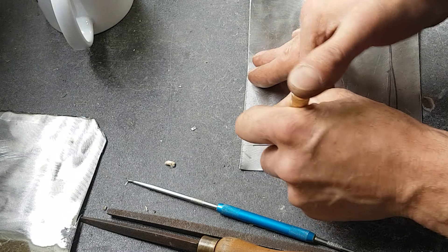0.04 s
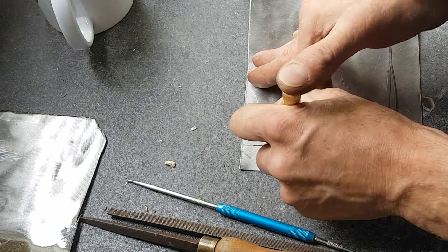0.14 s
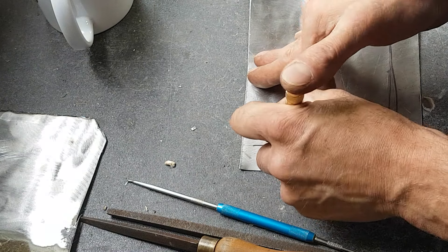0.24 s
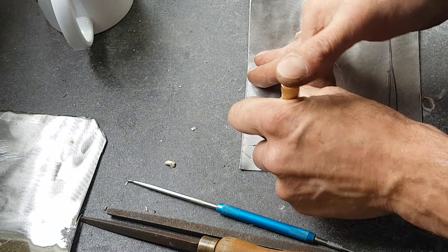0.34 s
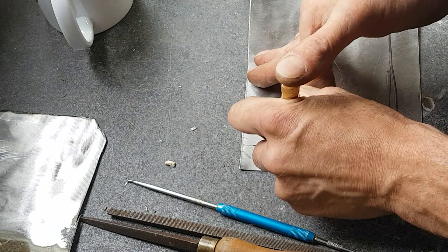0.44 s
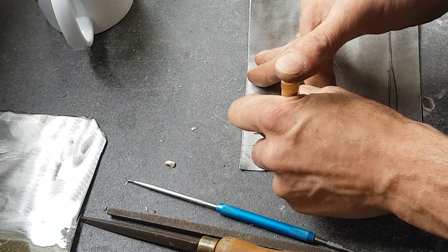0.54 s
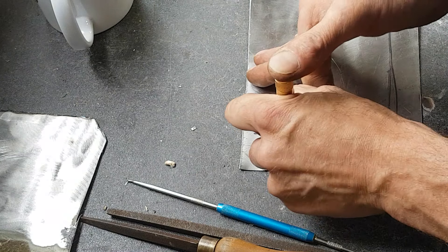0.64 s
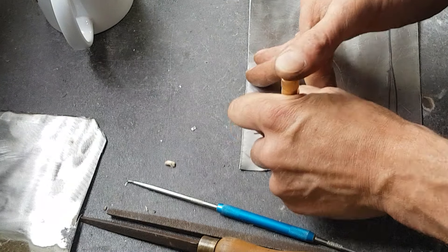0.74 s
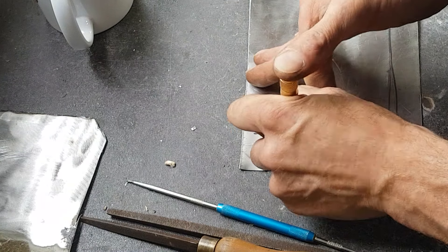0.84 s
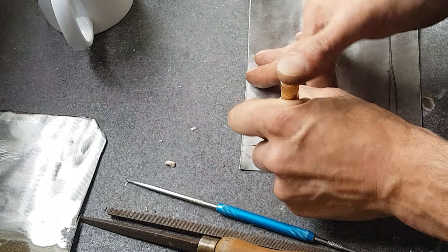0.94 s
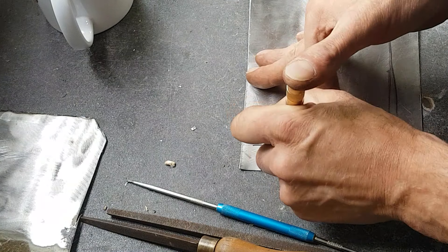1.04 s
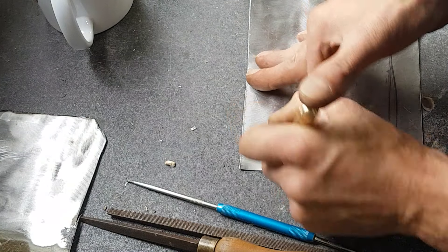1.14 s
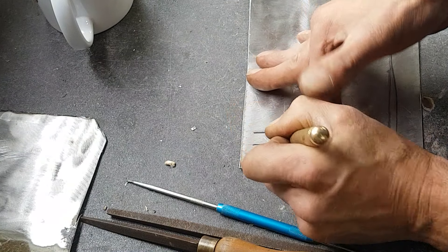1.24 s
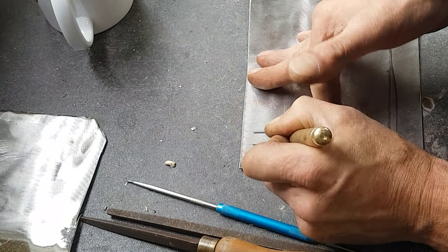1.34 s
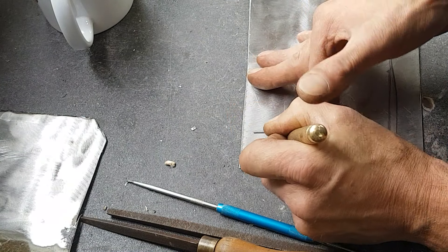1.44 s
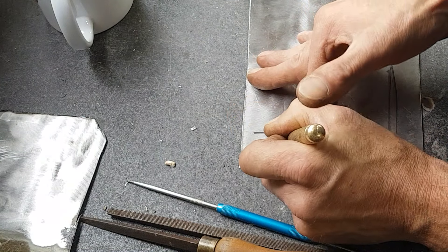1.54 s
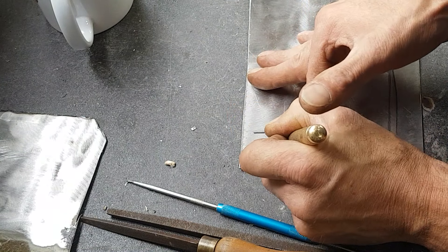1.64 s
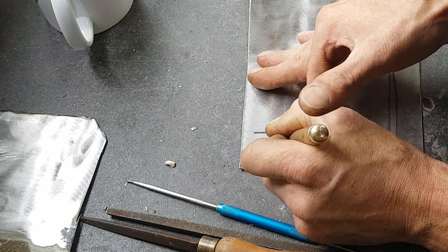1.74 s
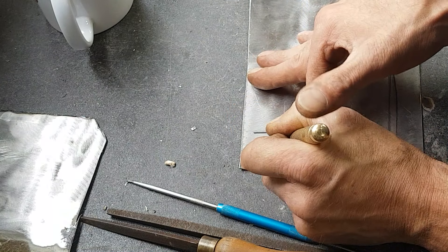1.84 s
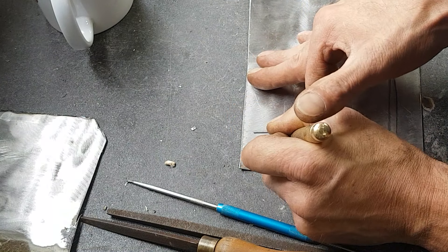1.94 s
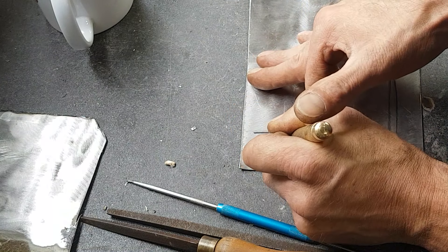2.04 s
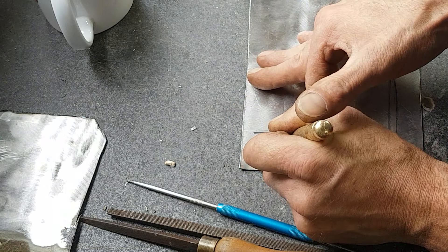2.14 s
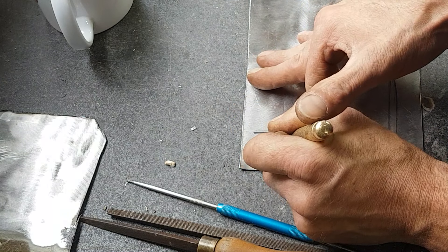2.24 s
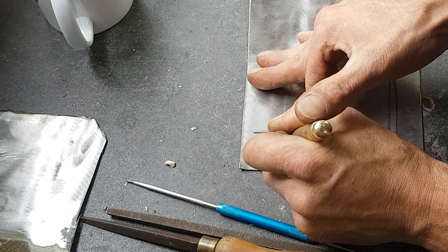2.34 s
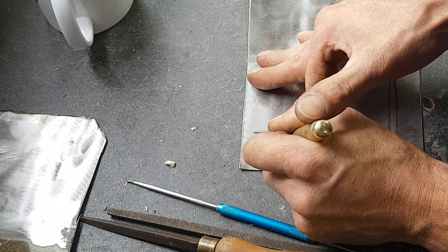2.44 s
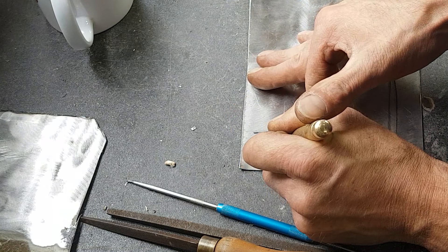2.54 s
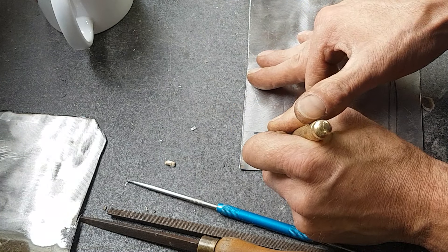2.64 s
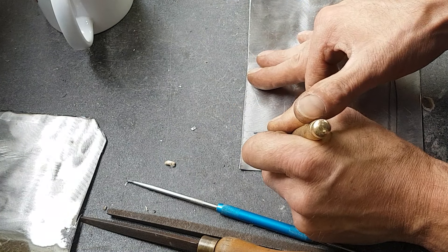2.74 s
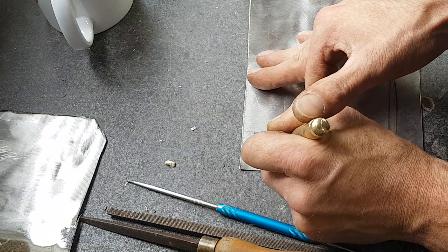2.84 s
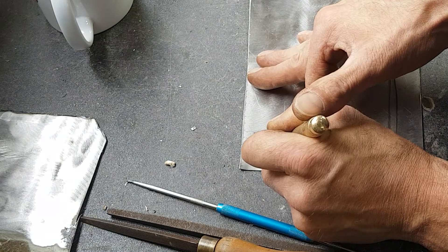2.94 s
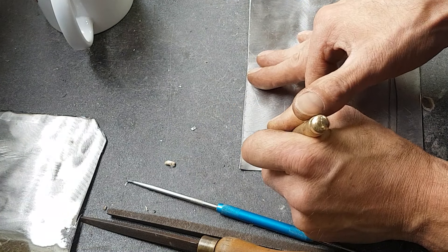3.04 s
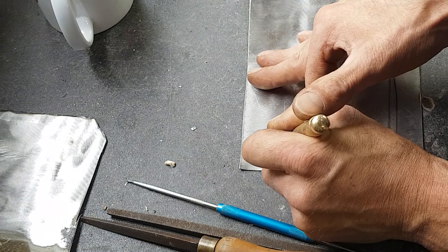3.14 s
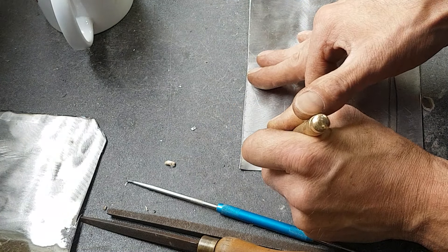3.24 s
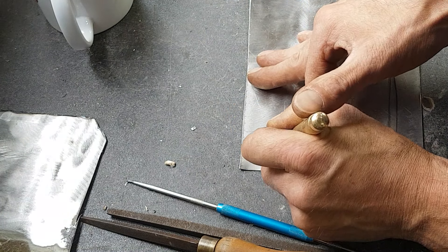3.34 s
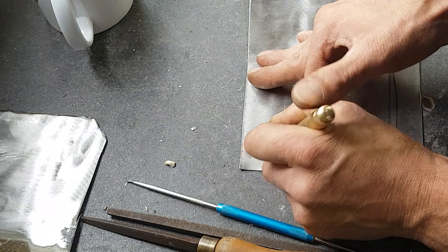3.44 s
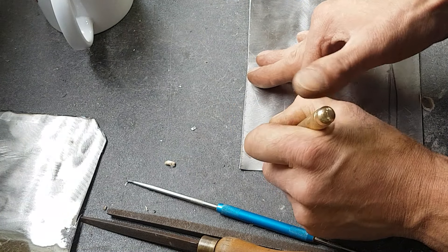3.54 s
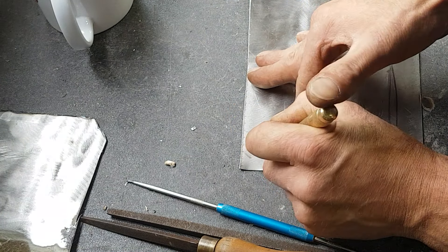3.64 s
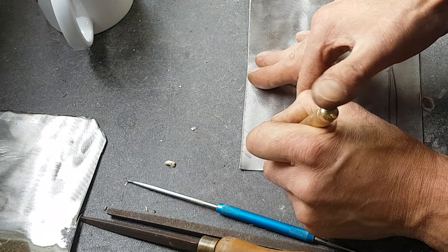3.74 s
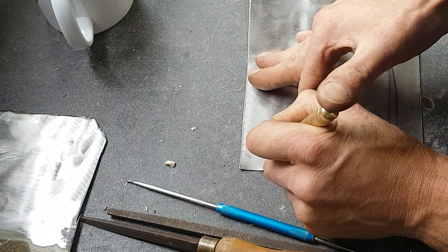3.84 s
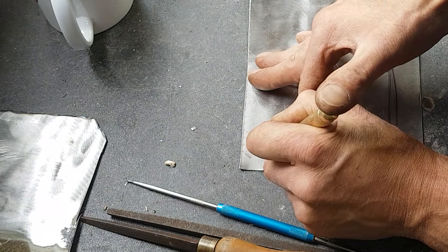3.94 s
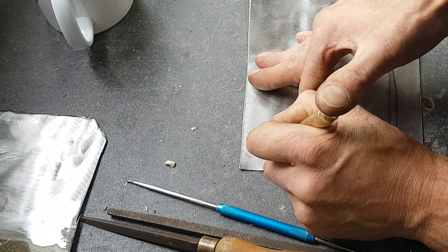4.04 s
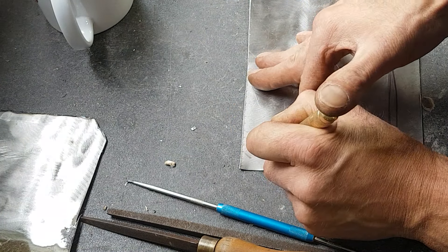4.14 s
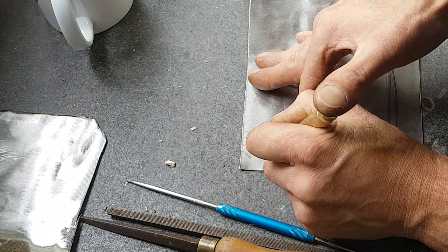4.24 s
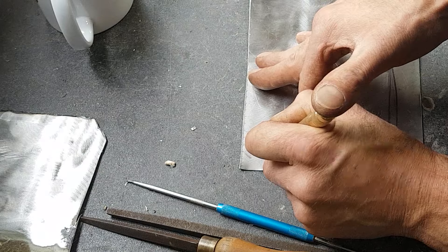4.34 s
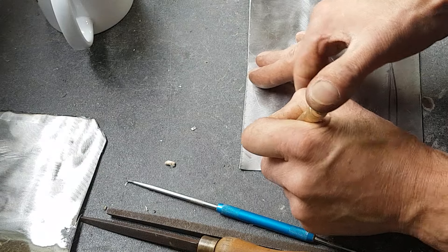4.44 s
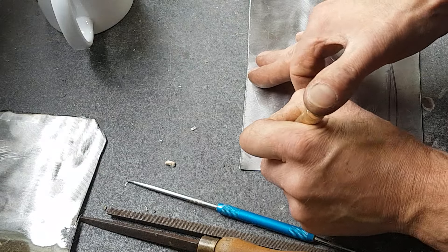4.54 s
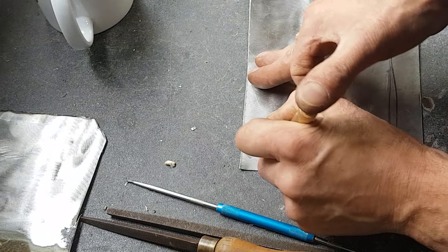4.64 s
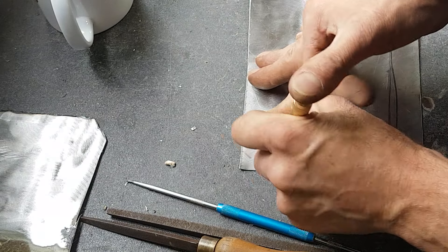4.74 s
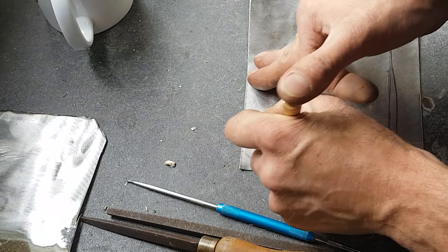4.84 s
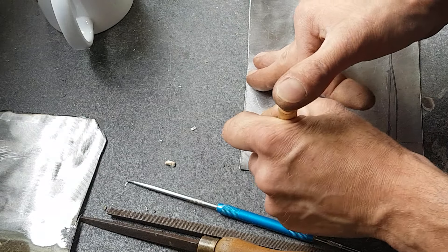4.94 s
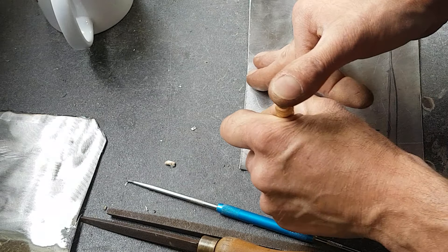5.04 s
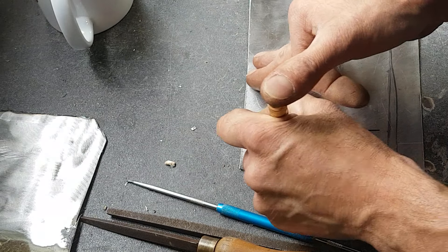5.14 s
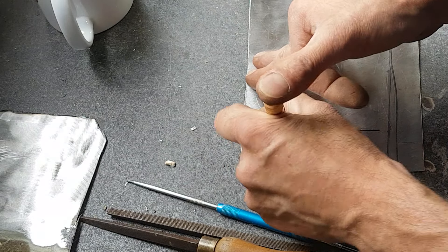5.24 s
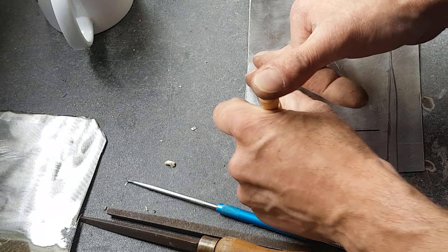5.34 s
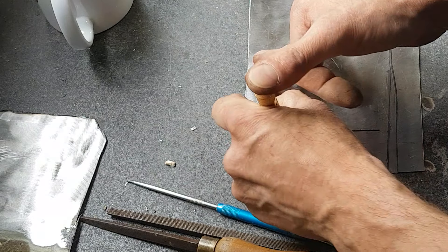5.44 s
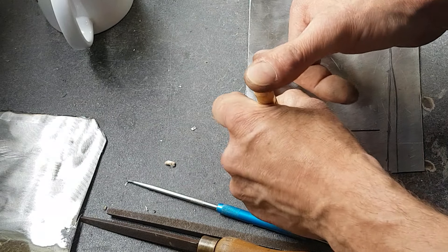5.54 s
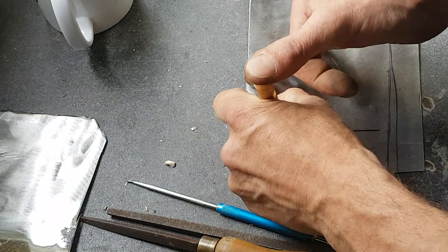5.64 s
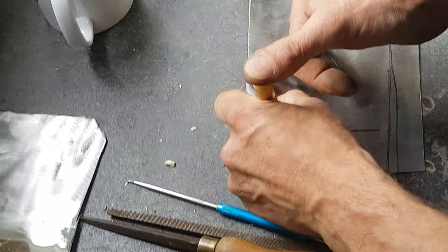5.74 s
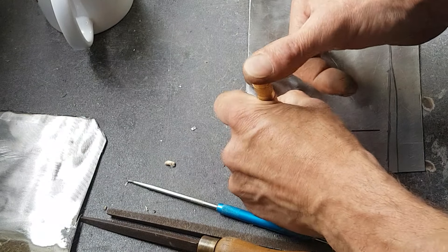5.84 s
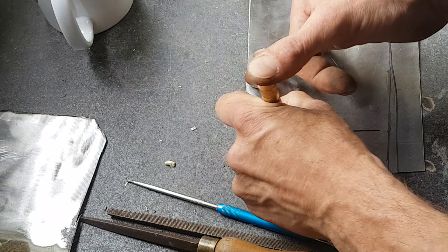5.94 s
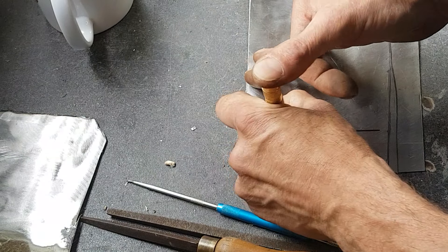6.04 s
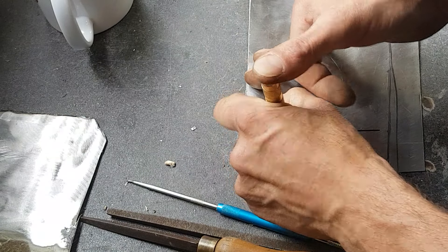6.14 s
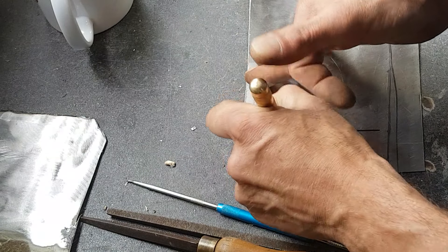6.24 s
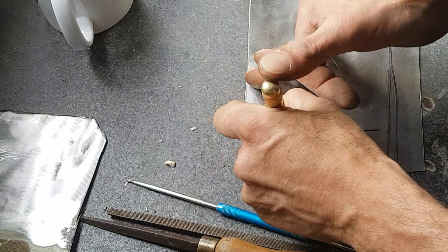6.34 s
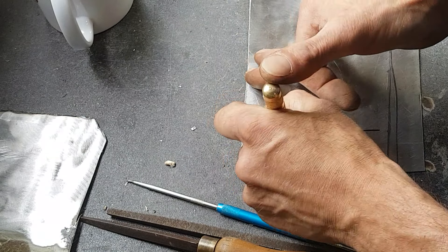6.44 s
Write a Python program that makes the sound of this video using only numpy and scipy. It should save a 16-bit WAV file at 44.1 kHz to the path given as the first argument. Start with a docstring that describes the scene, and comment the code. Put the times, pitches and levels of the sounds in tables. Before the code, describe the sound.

A spring punch fires twice on thin sheet steel, loud metallic cracks with short clatter, between small tip ticks, scrapes and bench thuds.

```python
"""A spring punch is pressed on thin sheet steel on a bench until it fires, twice: cracks, struck modes, clatter.
Its tip ticks and drags, as smaller strikes and as slips driving the sheet; shoves rock the sheet on the bench.
Fingers rub the steel as soft friction noise; a workshop hums softly as shaped noise.
The left microphone port faces the work; the recorder limits the blows and is slow to open up again."""
import sys
import numpy as np
from scipy import signal
from scipy.fft import rfft, irfft, next_fast_len
from scipy.io import wavfile
from scipy.ndimage import uniform_filter1d, minimum_filter1d, map_coordinates

SR = 44100
rng = np.random.default_rng(int(sys.argv[2]) if len(sys.argv) > 2 else 0)


def output_pcm(signal):
    """Save a mono or channel-first signal as 16-bit PCM at the path in sys.argv[1].

    Samples are clipped to [-1, 1] before scaling.
    """
    pcm = np.clip(np.atleast_2d(signal).T, -1, 1) * 32767
    wavfile.write(sys.argv[1], SR, np.round(pcm).astype(np.int16))


N = 287091

# workshop murmur spectrum: (frequency [Hz], relative level [dB])
MURMUR_SPECTRUM = [(55, -6.5), (90, -2), (130, -8), (196, -3), (265, -11), (765, -15), (1940, -21.5),
                   (3790, -27), (6100, -33.5), (9000, -38.5), (13000, -31.5), (15600, -28), (15900, -74.5)]
# workshop rumble spectrum: (frequency [Hz], relative level [dB])
RUMBLE_SPECTRUM = [(12, -41.5), (20, -2.5), (22, -10), (48, 7.5), (91, -7.5), (130, 0), (170, -36.5),
                   (290, -120)]
# murmur likeness of left and right: (frequency [Hz], likeness [-1 to 1])
MURMUR_LIKENESS = [(60, 1), (130, 1), (290, 0.27), (640, .12), (1500, .03)]
# finger friction spectrum: (frequency [Hz], relative level [dB])
SKIN_SPECTRUM = [(300, -12.5), (900, 3), (2200, 0.5), (4000, -4.5), (6000, -8.5), (9000, -27),
                 (14000, -17.5), (16000, -47.5)]
# finger strokes over the steel: (middle [s], length [s], level [dB])
STROKES = [(1.411, 0.78, -55.5), (3.639, 0.28, -56.5), (4.425, 0.29, -58.5), (4.673, 0.49, -58),
           (6.44, 0.65, -62)]
# hand shoves: (slip time [s], build-up [s], thud level [dB], rocking level [dB], dragging level [dB])
SHOVES = [(0.061, 0.017, -40, -36, -43.5), (.09, 0.018, -48, -49, -50), (.17, 0.043, -41, -36.5, -56),
          (0.193, 0.033, -39, -36, -39), (0.224, 0.043, -35.5, -37.5, -48), (.29, 0.024, -39.5, -43, -37),
          (0.362, 0.044, -32.5, -33, -32.5), (0.403, 0.047, -33, -32, -25), (0.477, 0.011, -35, -34, -38),
          (.53, 0.024, -37.5, -39, -39), (.57, 0.036, -35, -46, -45), (0.666, 0.024, -49, -50, -50.5),
          (1.0, 0.059, -42, -37, -42), (1.054, 0.15, -39.5, -41, -56), (1.155, 0.021, -38, -44, -39),
          (1.223, 0.07, -39, -47, -36.5), (2.898, 0.0089, -44, -48, -70), (2.947, .008, -33, -40.5, -36),
          (4.422, 0.021, -35.5, -42, -62), (4.498, 0.069, -47, -43, -54), (4.734, 0.027, -49.5, -48.5, -50),
          (4.835, 0.055, -49.5, -56, -55), (5.36, 0.011, -38, -40, -48), (5.41, 0.017, -39, -37, -41.5),
          (5.537, 0.13, -44.5, -49, -55.5), (5.591, 0.026, -39.5, -36.5, -44),
          (5.645, 0.093, -37.5, -40, -44.5), (5.69, 0.089, -31.5, -42, -35),
          (6.074, 0.048, -42.5, -36.5, -45.5), (6.103, 0.023, -43, -31.5, -40),
          (6.138, 0.026, -41.5, -40, -52), (6.205, 0.011, -40, -48, -51.5),
          (6.257, 0.023, -28.5, -33.5, -30.5)]
# bench modes damped under the pressed sheet: (frequency [Hz], relative level [dB], t60 before widening [s])
ROCK_MODES = [(130, 3, 0.076), (191, -3, 0.043), (305.3, 1, 0.053), (444.5, -16, 0.028)]
# bench top modes: (frequency [Hz], relative level [dB], t60 before contact damping [s])
BENCH_MODES = [(58.6, -28.5, 0.053), (138.3, -10.5, 0.31), (174.7, 3.5, 0.36), (201, -5, 0.48),
               (304.5, -7.5, 0.26), (339.3, -7, 0.23), (398, -0.5, 0.053), (469, -23, 0.47)]
# steel sheet modes: (frequency [Hz], relative level [dB], t60 before contact damping [s])
SHEET_MODES = [(630, -4, .18), (744, -5, .2), (920, -1, .18), (995, -4, .2), (1290, -6, .2),
               (1480, -5, .14), (1575, -4, .17), (1653, -6, .34), (1780, -5, .2), (2030, -7, .14),
               (2223, -2, .22), (2290, -4, .15), (2440, -6, .22), (2752, -2, .22), (3125, 1, .13),
               (3560, -5, .2), (4600, -8, .12), (4779, -13, .26), (6010, -17, .3), (6550, -7, .15)]
# steel barrel mode of the punch: (frequency [Hz], relative level [dB], t60 before damping [s])
TOOL_MODES = [(4163, 0, .36)]
# dense unresolved modes: (frequency [Hz], relative level [dB])
CLATTER_SPECTRUM = [(180, -32), (300, -10), (600, -15), (950, -8.5), (1600, -9.5), (2600, -10.5),
                    (4200, -11), (6500, -14), (8800, -15), (13100, -9.5), (15500, -12.5), (16000, -43)]
# clatter decay of sheet and room together: (frequency [Hz], t60 before contact damping [s])
CLATTER_DECAY = [(300, 0.33), (1500, 0.3), (5000, 0.28), (15000, 0.22)]
# first instant of a blow: (frequency [Hz], relative level [dB])
SHOCK_SPECTRUM = [(300, -14), (900, -4), (1600, 0), (3000, -6), (6000, -16), (12000, -24), (16000, -45)]
# tip and spring ticks: (time [s], level [dB], then against it low steel [dB], treble [dB],
# tool ring [dB]; favoured frequency [Hz])
TICKS = [(0.0553, -36, -22, -5, -26, 2310), (0.0823, -33, -34, -14, -22, 3180),
         (0.2703, -43, 2, -16, -14, 995), (0.183, -55, 14, -28, -25, 1610), (0.335, -40, 3, -14, -8, 2260),
         (0.3985, -25, 6, -8, -22, 1920), (0.5235, -53.5, 18, -31, -9.5, 1450),
         (0.669, -54.5, 7, -28, -23, 1730), (1.0406, -30, -1, -14.5, -17.5, 4700),
         (1.1536, -33, -12, -20, -25, 2750), (1.217, -18, -9, -4, -9.5, 2990),
         (2.5115, -50, 0.5, -29.5, -21.5, 3013), (2.94, -27, -8, -2.5, -37.5, 2196),
         (3.3276, -48.5, 1, -9, -25.5, 1910), (4.411, -49, -6, -33, -20, 2765),
         (4.73, -51.5, 3, -31.5, -22.5, 1500), (5.3526, -30, -3, -10, -14.5, 3470),
         (5.399, -32.5, -15, -21, -24, 3180), (5.686, -36, 11, -14, -19, 4140),
         (5.7234, -31.5, 22, -31, -21, 1620), (6.0921, -55, 16, -28, -22, 2240),
         (6.131, -35, -3.5, -28, -23, 4470), (6.1916, -48.5, 4, -35, -3, 1520),
         (6.2501, -31, 2, -16, -6, 3160), (6.288, -13, -1, -3.5, -4.5, 2250)]
# punch firings: (time [s], level [dB], then against it bench [dB], low steel [dB], treble [dB],
# tool ring [dB]; favoured frequency [Hz])
BLOWS = [(.771, 10.46, -23.5, 0.33, -5, -13, 1508), (5.7342, 1.1, -8.5, 4.2, -9, -17.5, 2960)]
# work sounds at the two ports: (frequency [Hz], left minus right [dB])
FACING_DB = [(60, -2.5), (200, 0), (700, 3.5), (2400, 12.5), (4400, 15), (8000, 28.5), (15000, 14.5)]

MURMUR_DB, RUMBLE_DB = -55.5, -58
STROKE_ENDS_DB = 14  # a stroke's ends lie this far under its middle
BUILD_DB, ROCK_FALL_DB_PER_S, DRAG_FALL_DB_PER_S = 17.5, 303.5, 402.5  # rise to the slip, falls after it
TICK_BENCH_DB = -12  # bench against the tick level
TOP_HZ = 16600


def amp(db):
    """Decibels to gain."""
    return 10 ** (np.asarray(db) / 20)


def unit(x):
    """x at rms 1."""
    return x / np.sqrt(np.mean(x ** 2) + 1e-20)


def along(points, hz):
    """(Hz, value) points interpolated on a log frequency axis."""
    f, v = np.transpose(points)
    return np.interp(np.log(hz + 1), np.log(f + 1), v)


def knots(count, size):
    """A smooth random line of size values through count knots."""
    return map_coordinates(rng.standard_normal(count + 4), [np.linspace(0, count, size)])


def wobble(knots_per_s):
    """A smooth random curve over the whole scene."""
    return knots(count=int(N * knots_per_s / SR), size=N)


def filtered(x, response):
    """x times a complex response of frequency."""
    n = x.shape[-1]
    m = next_fast_len(n + 8192)
    return irfft(rfft(x, m) * response(np.fft.rfftfreq(m, 1 / SR)), m)[..., :n]


def paired(pair, alike):
    """Two unrelated noises turned into left and right of the given likeness."""
    def mix(hz):
        turn = np.arccos(np.clip(along(alike, hz), -1, 1)) / 2
        return np.array([np.cos(turn), np.sin(turn)])
    mid, side = filtered(pair, mix)
    return np.array([mid + side, mid - side])


def resonances(modes, widen):
    """The causal response of modes under steady rubbing; contact widens them."""
    def response(f):
        total = 0
        for k, (mode_hz, db, t60_s) in enumerate(modes):
            width_hz = widen * np.log(1000) / np.pi / t60_s
            damped = 1j * f * width_hz
            total = total + (-1) ** k * amp(db) * damped / (mode_hz ** 2 - f * f + damped)
        return total
    return response


def ringing(modes, t, spread_db, skew, damping):
    """Struck modes at new strengths, with another phase at each port."""
    hz, db, t60_s = np.transpose(modes)[:, :, None]
    level, phase = rng.standard_normal((2, len(modes), 1))
    decay_db = -60 * t / (t60_s * damping)
    size = amp(db + spread_db * level + decay_db) * (1 - np.exp(-t / 0.0072))
    ports = [np.sum(size * np.sin(2 * np.pi * hz * t + side * skew * phase), 0) for side in (-1, 1)]
    return np.array(ports)


def workshop():
    """A steady noise murmur over a lumpy low rumble that swells slowly."""
    murmur = paired(rng.standard_normal((2, N)), MURMUR_LIKENESS)
    murmur = unit(filtered(murmur, lambda f: amp(along(MURMUR_SPECTRUM, f))))
    rumble = paired(rng.standard_normal((2, N)), [(50, 0.68)])
    rumble = unit(filtered(rumble, lambda f: amp(along(RUMBLE_SPECTRUM, f))))
    swell_db = 2.5 * wobble(4.3) + 1.5 * wobble(.8)
    return amp(MURMUR_DB) * murmur + amp(RUMBLE_DB + swell_db) * rumble


def fingers():
    """Soft friction noise, lightly coloured by the sheet."""
    t = np.arange(N) / SR
    strokes = sum(amp(db - STROKE_ENDS_DB * (2 * (t - s) / length_s) ** 2) for s, length_s, db in STROKES)
    noise = amp(1.1 * wobble(25) + 1.9 * wobble(200)) * rng.standard_normal((2, N))
    sheet = resonances(SHEET_MODES, widen=4)
    rub = filtered(noise, lambda f: amp(along(SKIN_SPECTRUM, f)) * (0.53 + np.abs(sheet(f))))
    return strokes * unit(rub)


def shoves(level_db, fall_db_per_s):
    """Envelope: pressure builds up to each slip and dies away after it."""
    t, power = np.arange(N) / SR, np.zeros(N)
    for (s, build_s, *_), db in zip(SHOVES, level_db):
        drop_db = np.where(t < s, BUILD_DB * (s - t) / build_s, fall_db_per_s * (t - s))
        power += amp(2 * (db - drop_db))
    return np.sqrt(power)


def rocking():
    """The shoved sheet rocks: uneven noise drives the damped bench modes."""
    _, _, thud_db, rock_db, _ = np.transpose(SHOVES)
    out = np.zeros((2, N))
    for level_db, modes in ((thud_db, ROCK_MODES[:2]), (rock_db, ROCK_MODES[2:])):
        bumps = amp(2.5 * wobble(30)) * rng.standard_normal((2, N))
        bumps = paired(bumps, [(130, 0.99), (300, 0.84), (640, 0.31)])
        rock = filtered(bumps, resonances(modes, widen=0.73))
        out += shoves(level_db, ROCK_FALL_DB_PER_S) * unit(rock)
    return out


def dragging():
    """The tip's uneven slips drive the sheet modes."""
    *_, drag_db = np.transpose(SHOVES)
    tilt = [(600, 1), (900, 1.0), (2400, -6), (3200, -19), (5000, -28)]
    drag = np.zeros((2, N))
    for third in range(3):  # as the tip moves, three groups of modes swell and fade independently
        unevenness = amp(4 * wobble(22) + 5.5 * wobble(300))
        slips = unevenness * paired(rng.standard_normal((2, N)), [(1000, .3)])
        modes = resonances(SHEET_MODES[third::3], widen=1.5)
        drag += filtered(unit(slips), lambda f: modes(f) * amp(along(tilt, f)))
    return shoves(drag_db, DRAG_FALL_DB_PER_S) * unit(drag)


def clattering(t, crack_t60_s, tail_db, damping):
    """A crack alike at both ports, then dense sheet modes as noise dying by band."""
    hz, frame_s, z = signal.stft(rng.standard_normal((2, len(t))), SR, nperseg=128)
    fade = amp(-60 * frame_s / damping / along(CLATTER_DECAY, hz)[:, None])
    tail = signal.istft(z * fade, SR, nperseg=128)[1][:, :len(t)]
    chatter = amp(0.57 * knots(count=90, size=len(t)))  # the loose sheet buzzes against the bench
    crack = amp(-60 * t / crack_t60_s) * paired(rng.standard_normal((2, len(t))), [(1000, 1.0)])
    crowd_db = 2.5 * knots(count=110, size=1000)  # crowded high modes, never struck alike
    crowd_hz = np.linspace(0, SR / 2, len(crowd_db))
    colour = lambda f: amp(along(CLATTER_SPECTRUM, f) + 14.5 + np.interp(f, crowd_hz, crowd_db))
    return filtered(crack + amp(tail_db) * chatter * tail, colour)


def strikes(rows, spread_db, crack_t60_s, tail_db, ring_db, favour_db, damping):
    """Each contact cracks, rings bench, sheet and tool, and leaves a clatter."""
    out, t = np.zeros((2, N + SR)), np.arange(SR // 2) / SR
    for s, db, bench_db, low_steel_db, treble_db, tool_db, favoured_hz in rows:
        clatter = clattering(t, crack_t60_s, tail_db, damping)
        sheet = amp(ring_db) * ringing(SHEET_MODES, t, spread_db, 2.0, damping)
        tilt = [(700, low_steel_db), (1300, low_steel_db), (2000, 0.0086), (6500, 0.044), (8500, treble_db)]
        # the spot struck favours nearby modes
        spot_db = lambda f: favour_db * np.exp(-(np.log((f + 1) / favoured_hz) / 0.06) ** 2)
        steel = filtered(clatter + sheet, lambda f: amp(along(tilt, f) + spot_db(f)))
        steel *= 1 - np.exp(-t / 0.00081)
        bench = amp(bench_db) * ringing(BENCH_MODES, t, spread_db, 0.5, damping)
        tool = amp(tool_db) * ringing(TOOL_MODES, t, 0, 2.5, 0.79)
        out[:, round(s * SR):][:, :len(t)] += amp(db) * (steel + bench + tool)
    return out[:, :N]


def ticks():
    """Tip and spring tick: light strikes of uneven mode strengths."""
    rows = [(s, db, TICK_BENCH_DB, *rest) for s, db, *rest in TICKS]
    return strikes(rows, 4, crack_t60_s=0.05, tail_db=-10.5, ring_db=-13, favour_db=10.5, damping=0.84)


def shocks(burst_db, t60_s, push_db):
    """The first instant of each blow runs through the bench to both ports, largely alike."""
    out, t = np.zeros((2, N)), np.arange(SR // 10) / SR
    for s, blow_db, *_ in BLOWS:
        noise = paired(rng.standard_normal((2, len(t))), [(100, 0.63), (3000, 0.85)])
        burst = amp(-60 * t / t60_s) * (1 - np.exp(-t / 0.0016)) * noise
        burst = amp(burst_db) * filtered(burst, lambda f: amp(along(SHOCK_SPECTRUM, f)))
        u = t / .0025
        push = amp(push_db) * amp([[2], [-2]]) * u * (2 - u) * np.exp(-u)  # the whole bench jolts once
        out[:, round(s * SR):][:, :len(t)] += amp(blow_db) * (burst + push) * (t > 0)
    return out


def blows():
    """The punch fires: heavy strikes on sheet and bench."""
    return strikes(BLOWS, 0, crack_t60_s=0.032, tail_db=-5.5, ring_db=-12, favour_db=6.5, damping=1.0)


def scene():
    """The work is near the left port; the recorder's body shades the right one from its treble."""
    work = fingers() + rocking() + dragging() + ticks() + blows()
    shaded = filtered(work, lambda f: amp(2.0 - [[0], [1]] * along(FACING_DB, f)))
    jolt = shocks(burst_db=14, t60_s=0.026, push_db=-15)
    return workshop() + shaded + jolt


def record(dry):
    """A look-ahead limiter, a slower gain control that holds and then creeps back, and the band limit."""
    ahead, ramp, hold = round(.016 * SR), round(.006 * SR), round(.6 * SR)  # samples
    release_db = 180 * np.arange(N) / SR
    over_db = np.maximum(20 * np.log10(np.abs(dry).max(0) + 1e-9) + .4, 0)
    peak_db = -minimum_filter1d(-over_db, size=ahead + 1, origin=-(ahead // 2))
    fast_db = np.maximum.accumulate(peak_db + release_db) - release_db  # lets go at a steady rate
    fast_db = uniform_filter1d(fast_db, size=ramp)
    lasting_db = np.maximum(0.91 * fast_db - 9.0, 0)  # only deep limiting turns the gain down for long
    padded_db = np.pad(lasting_db, (hold, 0))
    held_db = -minimum_filter1d(-padded_db, size=hold + 1, origin=hold // 2)[hold:]
    keep = np.exp(-1 / (.17 * SR))
    slow_db = np.maximum(held_db, signal.lfilter([1 - keep], [1, -keep], held_db))
    return filtered(dry * amp(-np.maximum(fast_db, slow_db)), lambda f: f < TOP_HZ)


dry = scene()
out = record(dry)
output_pcm(out)
```